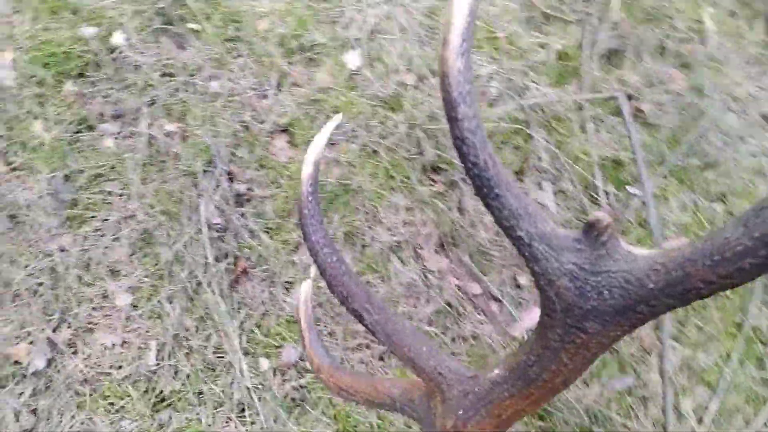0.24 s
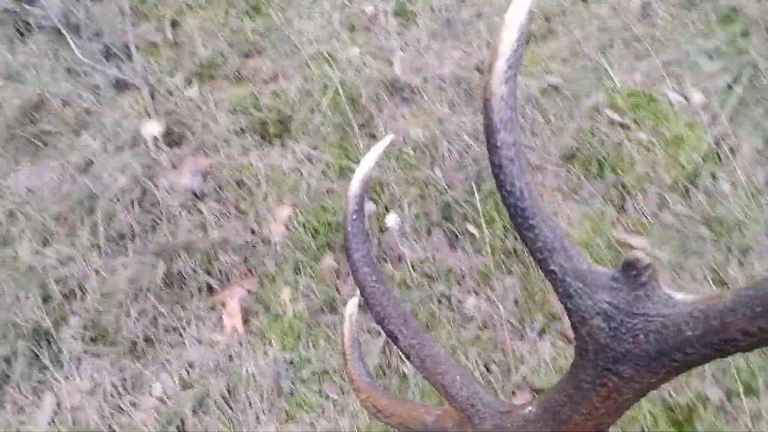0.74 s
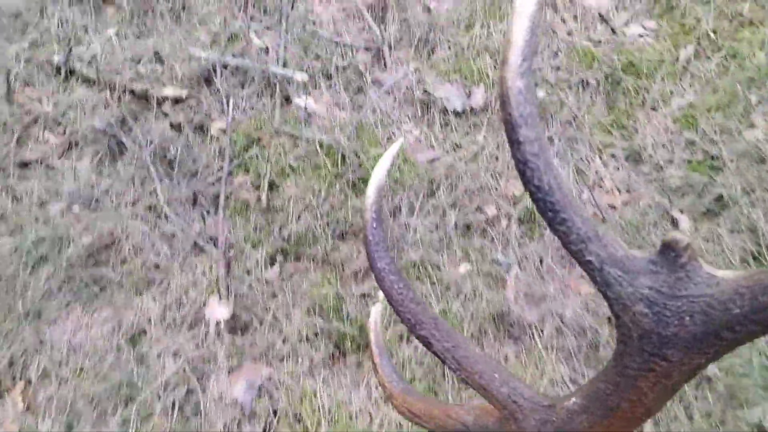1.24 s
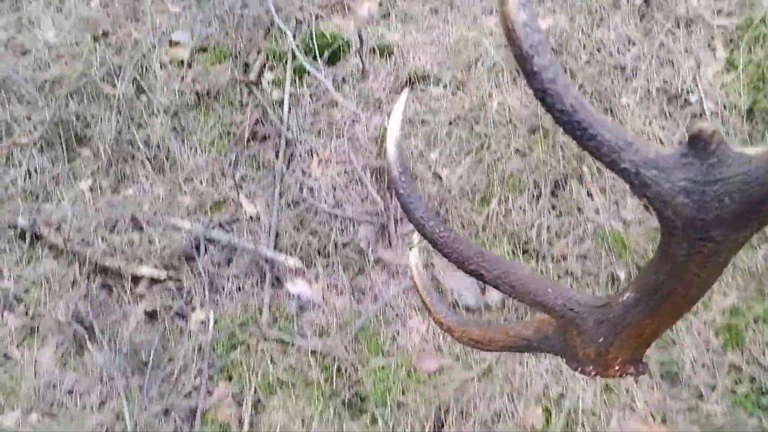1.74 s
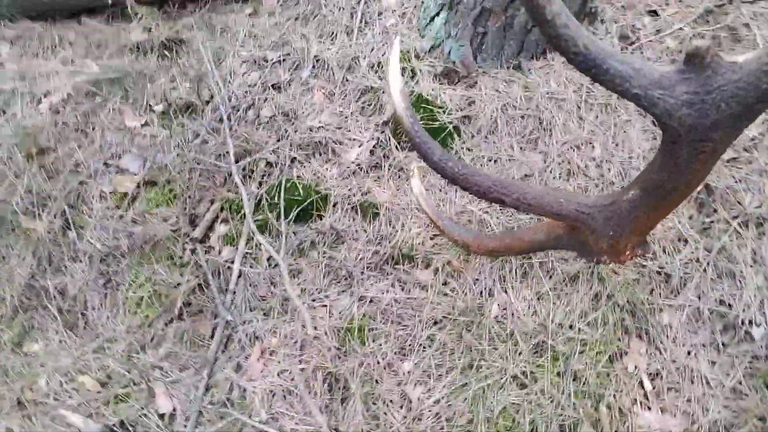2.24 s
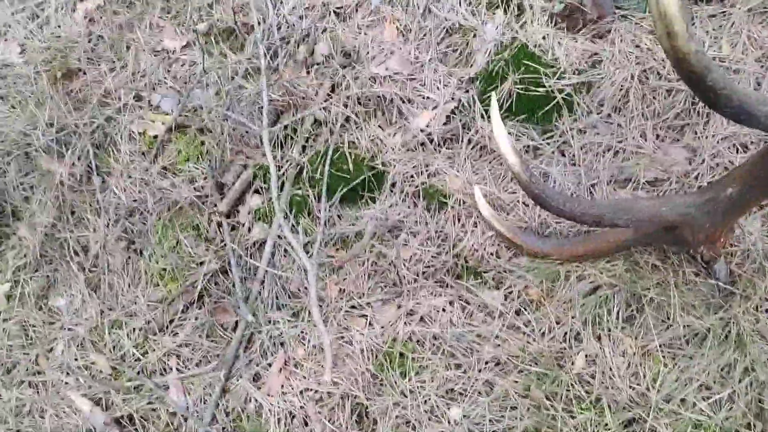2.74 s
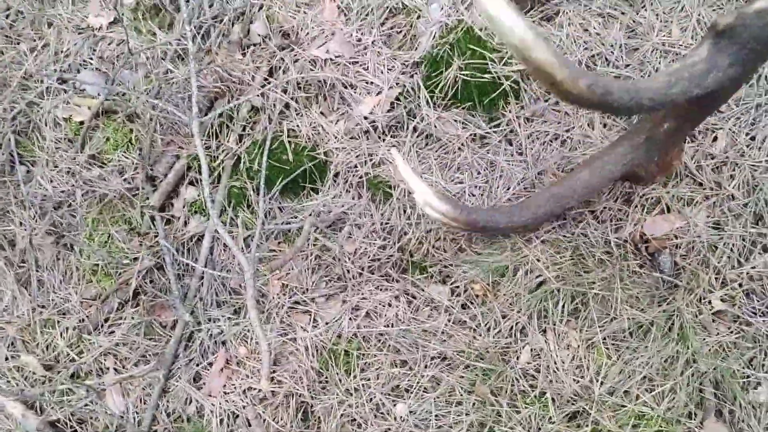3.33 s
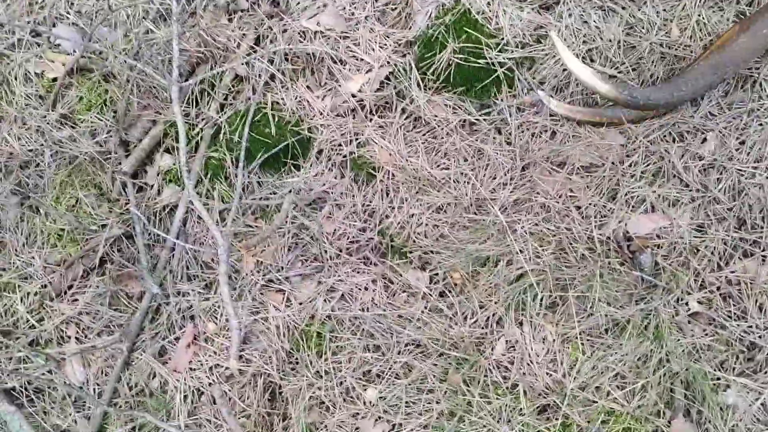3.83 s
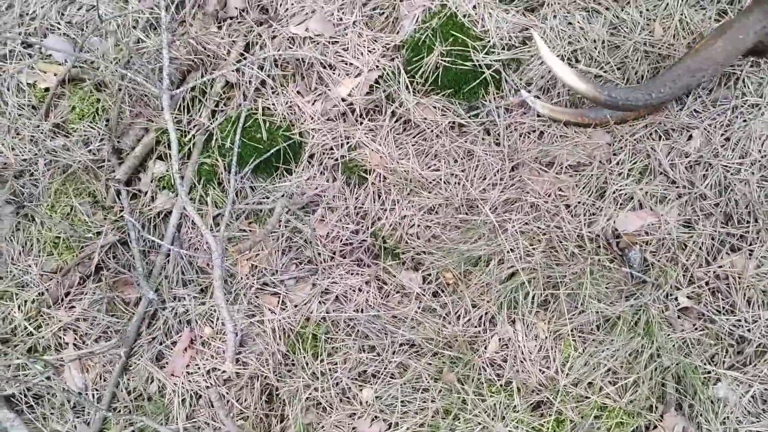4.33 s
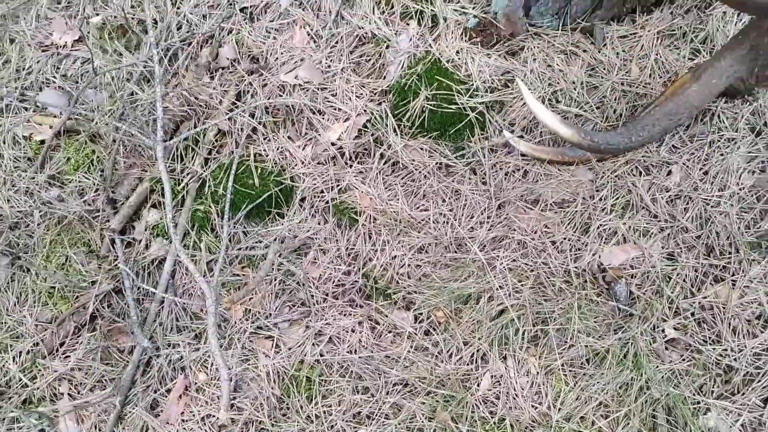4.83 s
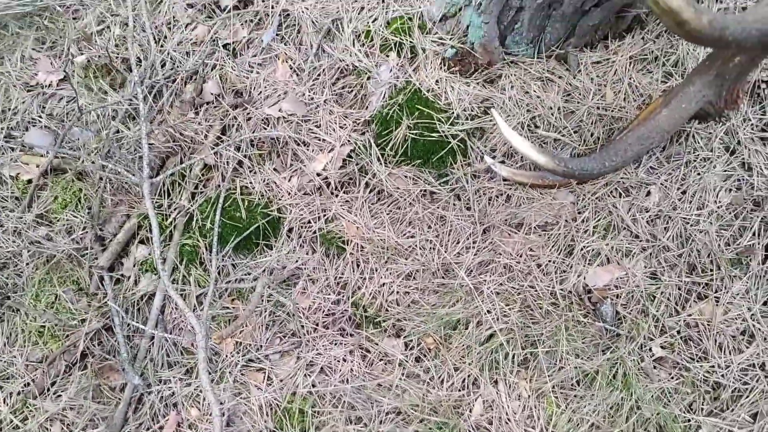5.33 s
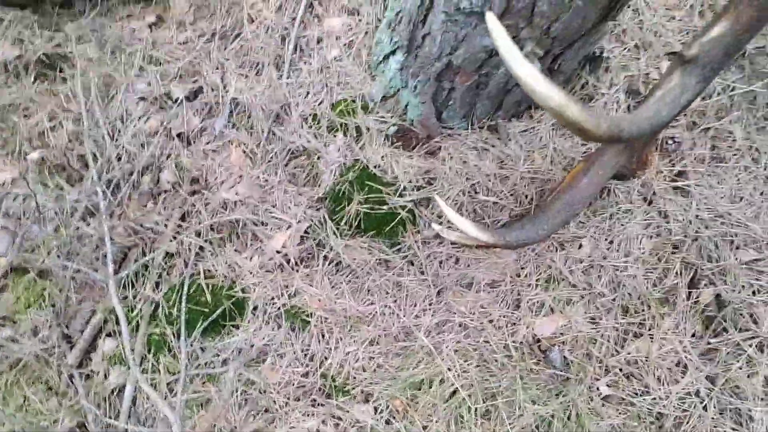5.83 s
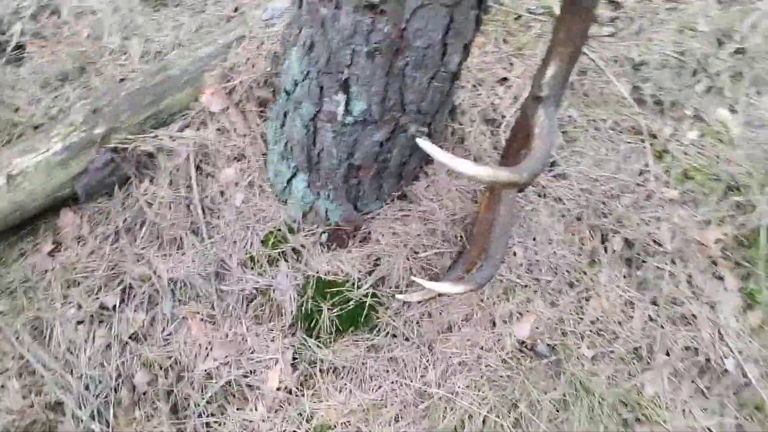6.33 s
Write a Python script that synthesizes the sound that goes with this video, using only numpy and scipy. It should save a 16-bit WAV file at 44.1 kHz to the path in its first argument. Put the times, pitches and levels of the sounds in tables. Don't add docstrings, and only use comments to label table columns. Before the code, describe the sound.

Slow boots crush dry needles, grass and twigs on a quiet forest floor, heard close from above in stereo by a hand-held phone, over barely audible distant wind. From 0 to 3.7 s the tread is a bright, uneven crackle with dull soil crunch beneath; a twig snaps loudly at 1.1 s, others around 1.4 to 1.5 s and 2.0 to 2.5 s, with soft thuds at 0.7 and 2.2 s. At 3.8 s a strong dragging scuff leads into clustered snaps and a soft low knock near 4 s. Light shifting rustles and a few ticks follow, fading almost to silence around 5.4 s. From 5.9 s crunching swells again, with a thud at 6.05 s, a sharp snap at 6.2 s, and a hard bump at 6.38 s, clicky and hollow with a low push on the left. Snaps and a scuff finish by 6.5 s.

```python
import sys
import numpy as np
from scipy import signal
from scipy.fft import rfft, irfft, next_fast_len
from scipy.io import wavfile
from scipy.ndimage import uniform_filter1d

SR = 44100
rng = np.random.default_rng(int(sys.argv[2]) if len(sys.argv) > 2 else 0)


def invert_db(x):
    u = np.asarray(x, float) / 20
    return 10 ** u


def wrap_up_sound(samples):
    columns = np.atleast_2d(samples).T
    tamed = np.clip(columns, -1, 1)
    steps = np.round(tamed * 32767).astype(np.int16)
    wavfile.write(sys.argv[1], SR, steps)


N = 289888
PORT_LAG = 3

# (frequency [Hz], left [dB], right [dB])
PORT_COLOUR = [(153, 9, 4), (318, 4, -2), (810, 0, -4), (1870, -3, 0.5), (2840, -5, -10),
               (4380, -3.5, -3.5), (5500, -0.5, 6.5), (6770, 3.5, 10), (8040, 9.5, 9), (8990, 8, 16),
               (9840, 4.5, 10), (12000, -6, -2), (14200, -5.5, -4.5), (17300, -5.5, -20.5)]
# (frequency [Hz], left [dB], right [dB])
HUM_COLOUR = [(13.9, 20.5, 17.5), (39, 5, -10), (97, -7, -14), (324, 2.5, -6), (724, -11, -31.5),
              (2000, -27, -29.5), (3860, -25.5, -19.5), (7500, -42, -41.5), (9000, -54, -32.5),
              (10500, -68, -61), (14000, -52, -55)]
# (time [s], level [dB])
AIR_GUSTS = [(0.0, -67), (0.12, -73), (1.67, -72), (1.75, -78), (1.81, -67), (2.44, -75), (2.51, -63),
             (2.91, -73), (3.03, -67), (3.12, -75), (3.86, -67), (3.98, -60), (4.03, -70), (5.7, -71),
             (6.19, -63), (6.3, -55)]
# (time [s], rise [s], level [dB])
SOIL_THUDS = [
    (0.711, 0.0049, -51.5),
    (2.191, 0.0042, -49),
    (2.391, 0.0046, -54),
    (2.848, 0.0066, -61),
    (3.53, 0.0052, -59),
    (3.956, 0.014, -50),
    (4.05, .05, -64),
    (4.33, .03, -64),
    (6.043, 0.004, -49),
    (6.245, 0.0041, -52.5),
]
# (time [s], start pitch [Hz], end pitch [Hz], time to fade 60 dB [s], left [dB], right [dB])
BODY_KNOCKS = [
    (3.966, 310, 234, 0.06, -41.5, -50),
    (6.3823, 890, 690, 0.0075, -14.5, -31),
    (6.3802, 9250, 9250, 0.007, -16, -8),
    (6.3797, 14800, 14000, 0.003, -20, -22),
    (6.4636, 14000, 14000, 0.003, -28, -34),
    (6.3799, 5500, 5300, 0.004, -13, -10),
    (6.3890, 215, 156, 0.058, -22, -56),
]
# (time [s], rise [s], left level [dB])
PRESSURE_DIPS = [
    (6.384, 0.0066, -18),
]
# (time [s], peak [dB], wood re peak [dB], body re peak [dB], left minus right [dB])
STICK_BREAKS = [(.0439, -41.5, -7, -1, -10.5), (.1254, -22, -16, -18, 2), (.414, -52, -16, -11, -5),
                (.7104, -29, -34, -18, -6), (.726, -35, -26, -13.5, -9), (1.0928, -15, -36, -27, -2.5),
                (1.1121, -40.5, -16, -12, -6), (1.2095, -42, -9, -8, -15), (1.417, -23, -19, -30, -2),
                (1.4535, -28, -6.5, -19, -4), (1.5198, -25.5, -24, -18, 2), (1.5564, -40, -7.5, -12.5, -6),
                (2.0168, -38, -24, -21, -8), (2.0408, -30, -13, -19, -3), (2.0614, -27, -17, -24, -8),
                (2.396, -38, -23, -16, -5.5), (2.4345, -42, -22, -15, -4), (6.1369, -30, -20, -23, 1.5),
                (6.379, -16, -14, -24.5, 3), (6.4635, -14, -28, -29, 8), (6.497, -33.5, -12, -11, -4),
                (6.5021, -29, -18, -17.5, 6), (6.5138, -33, -30, -24, 2.5), (6.534, -21, -33, -25, -2)]
# (time [s], peak [dB], wood re peak [dB], splinters re peak [dB], left minus right [dB])
TWIG_TEARS = [(.5443, -27, -23, -23, -18), (.7668, -27, -39, -18, -13.5), (2.4977, -25, -30, -20, -2),
              (3.8206, -33, -12, -20, -9), (3.953, -27, -7, -17, 1), (3.9552, -19, -13, -15, .5),
              (3.9951, -19, -49, -12, 7), (4.0185, -28, -22, -20, 2.5), (4.0845, -26.5, -16, -2, 6),
              (4.4556, -24, -13.5, -1, 2.5), (4.513, -25.5, -24, -13, 3.5), (4.5407, -43, -25, -11, -6),
              (4.9607, -37, -17, -9, -5), (1.132, -46, -22, -20, -2), (4.15, -46, -26, -20, -6),
              (5.4093, -58, -20, -20, -1), (5.5313, -55, -28, -20, -6), (6.054, -35, -16, -13, -8),
              (6.1922, -13, -33, -12, -7)]
# (time [s], peak [dB], left minus right [dB])
STEM_TICKS = [(.5137, -47, -9), (.5177, -46, -6.5), (.8126, -45, -6.5), (1.0365, -46, -3),
              (1.3219, -38, -3), (1.8657, -35, -5), (1.899, -35, -6), (1.952, -42, -6), (2.0655, -32, -6),
              (2.13, -37, -5), (2.175, -36, -5), (2.179, -36, -5), (2.258, -35, -5), (2.742, -37, -6),
              (2.808, -31, -6), (2.818, -33, -6), (2.871, -37, -6), (3.262, -37, -7), (3.4456, -36, -7.5),
              (3.7813, -42, -5), (3.8033, -33, -6), (3.881, -38, -5), (3.9, -39, -5), (4.364, -46, -6),
              (4.3989, -50, -6), (4.6663, -54, -4.5), (4.8519, -53, 0), (4.8683, -50, 0),
              (5.003, -49, -2.5), (6.1105, -31, -2.5), (.571, -36, -6), (.617, -37, -12), (.841, -34.5, -9),
              (.8751, -32, -10), (1.057, -43, -3.5), (1.154, -38, -2), (1.3484, -40, -18),
              (1.835, -39.5, -8), (1.8876, -31.5, -7.5), (2.0348, -30.5, -9), (2.0549, -28, -7),
              (2.112, -35, -11), (2.4787, -41, 0), (2.5054, -29.5, -4), (2.5455, -33.5, -12),
              (3.035, -40, -11), (3.209, -31.5, -6), (3.252, -39, -7.5), (3.3635, -38, -10.5),
              (3.6278, -42, 0), (4.0229, -31.5, -4), (4.2794, -38.5, -11), (4.3129, -39.5, -4),
              (4.6812, -45, 2), (4.748, -50, -2), (4.9047, -47, 0), (5.1224, -51, -1), (5.5097, -52.5, -9),
              (6.1886, -26, -3), (6.1912, -19, -6)]
# (time of top [s], rise [s], fall [s], swell [dB])
SOLE_SCUFFS = [
    (.575, 0.0091, 0.075, 6.5),
    (1.185, .006, .09, 5),
    (1.839, 0.013, 0.065, 7.5),
    (2.04, 0.038, 0.027, 8.5),
    (2.499, .004, 0.11, 8),
    (2.811, 0.021, 0.036, 5.5),
    (3.215, 0.0055, 0.078, -0.5),
    (3.835, 0.039, 0.043, 18.5),
    (6.046, 0.0047, 0.037, 6.5),
    (6.47, 0.0046, 0.029, 10),
]
# (time of top [s], time to rise 20 dB [s], time to fall 20 dB [s], crackle [dB], soil crunch [dB])
WALKING_PRESSES = [(.1, .5, .27, -56, -62), (.43, .4, .3, -74, -69), (.56, .07, .5, -55, -65),
                   (.66, .18, .25, -52, -59), (.84, .2, .16, -58, -62), (1.11, .16, .1, -58, -72),
                   (1.19, .04, .6, -58, -57), (1.33, .17, .2, -46.5, -58), (1.5, .4, .17, -55, -57),
                   (1.74, .4, .3, -74, -75), (1.88, .05, .6, -58, -67), (2.03, .18, .6, -52, -62),
                   (2.23, .5, .2, -48, -57), (2.4, .4, .25, -59, -61), (2.56, .3, .6, -53, -76),
                   (2.72, .25, .5, -50, -64), (2.85, .3, .3, -51, -68), (2.99, .5, .18, -54, -63),
                   (3.27, .18, .4, -52, -61), (3.53, .6, .25, -53, -64), (3.68, .5, .3, -59, -75)]
# (time of top [s], time to rise 20 dB [s], time to fall 20 dB [s], crackle [dB], soil crunch [dB])
WEIGHT_SHIFTS = [(3.86, .4, .4, -57, -66), (4.0, .1, .2, -49, -59), (4.23, .25, .1, -59, -68),
                 (4.35, .5, .25, -66, -68), (4.51, .3, .045, -58, -80), (4.7, .3, .4, -73, -84),
                 (4.93, .25, .3, -64, -74), (5.12, .4, .07, -72, -80), (5.42, .5, .5, -86, -88),
                 (5.65, .22, .6, -70, -75), (5.86, .25, .2, -56, -69), (6.05, .03, .4, -56, -59),
                 (6.14, .13, .5, -45, -53), (6.22, .4, .24, -49, -63), (6.56, .15, .2, -45, -51)]
# (time [s], left minus right [dB])
PHONE_TURN = [(0, -1), (.27, 1), (.45, -4), (.8, -5), (.97, 0), (1.4, 1.5), (1.72, 1.5), (1.92, -4.5),
              (2.4, -2.5), (2.95, -6), (3.17, -2), (3.33, -6), (3.85, -4), (4.15, 1.5), (4.5, -3),
              (4.95, 1), (5.9, -2.5), (6.57, 2.5)]


def level(x, db):
    return x * invert_db(db) / np.sqrt(np.mean(np.mean(x, axis=0) ** 2))


def colour(x, table):
    hz, *channels_db = np.transpose(table)
    size = next_fast_len(N + 4096)
    log_hz = np.log(np.maximum(np.fft.rfftfreq(size, 1 / SR), 1))
    curves_db = np.array([np.interp(log_hz, np.log(hz), db) for db in channels_db])
    cepstrum = irfft(np.log(invert_db(curves_db)), size)
    cepstrum[:, 1:size // 2] *= 2
    cepstrum[:, size // 2 + 1:] = 0
    return irfft(rfft(x, size) * np.exp(rfft(cepstrum)), size)[:, :N]


def band(x, lo_hz, hi_hz):
    return signal.sosfilt(signal.butter(2, [lo_hz, hi_hz], "band", fs=SR, output="sos"), x)


def pair(alike, size=N, lag=0):
    mid, side = rng.standard_normal((2, size))
    alike = np.clip(alike, 0, 1)
    left, right = np.sqrt(1 + alike) * mid + np.sqrt(1 - alike) * side * np.array([[1], [-1]])
    return np.array([np.roll(left, lag), right])


def walk(rate_hz):
    hold = int(SR / rate_hz)
    steps = np.repeat(rng.standard_normal(N // hold + 1), hold)
    return 1.15 * uniform_filter1d(uniform_filter1d(steps, hold), hold)[:N]


def hum():
    wind = level(colour(pair(alike=0.19), HUM_COLOUR), -65.5) * invert_db(0.72 * walk(2.53))
    air = level(band(pair(alike=0.11), 11, 95) * np.array([[1], [.4]]), -71.5)
    gust_db = np.interp(np.arange(N) / SR, *np.transpose(AIR_GUSTS)) + 69.5
    return wind + air * invert_db(gust_db + 1.5 * walk(9))


def thuds():
    start, rise, db = np.transpose(SOIL_THUDS)
    u = np.maximum(np.arange(N) / SR - start[:, None], 0) / rise[:, None]
    swell = invert_db(db) @ (u * np.exp(1 - u))
    return swell * level(band(pair(alike=0.88), 125, 352) * np.array([[1], [.45]]), 0)


def knocks():
    t, out = np.arange(N) / SR, 0
    for s, start_hz, end_hz, fade_s, *db in BODY_KNOCKS:
        u = np.maximum(t - s, 0)
        turns = end_hz * u + (start_hz - end_hz) * 0.0032 * (1 - np.exp(-u / 0.0037))
        ring = np.sin(2 * np.pi * turns) * 1000. ** (-u / fade_s)
        out = out - invert_db(np.array(db))[:, None] * ring
    return out


def pressure_dips():
    t, out = np.arange(N) / SR, 0
    for s, rise, db in PRESSURE_DIPS:
        u = np.maximum(t - s, 0) / rise
        swing_back = 0.2 * (u / 4.6) * np.exp(1 - u / 5.5)
        push = u * np.exp(1 - u) - swing_back
        out = out - invert_db(db) * push * np.array([[1], [.03]])
    return out


def breaks():
    sticks = [(*row, -22) for row in STICK_BREAKS]
    twigs = [(s, db, wood, -53, pan, tail) for s, db, wood, tail, pan in TWIG_TEARS]
    ticks = [(s, db, -22, -27, pan, -19) for s, db, pan in STEM_TICKS]
    return sticks + twigs + ticks


def snaps():
    t = np.arange(1024) / SR
    parting = np.exp(-((t - .0006) / np.where(t < .0006, .00012, .0007)) ** 2)
    wood_swell = np.exp(-((t - .0014) / .00054) ** 2)
    body_swell = np.exp(-((t - .0023) / .001) ** 2)
    splinters = (1 - np.exp(-t / .001)) ** 2 * np.exp(-t / .003)
    crack, wood, body = (np.zeros((2, N + len(t))) for _ in range(3))
    for s, db, wood_db, body_db, pan_db, tail_db in breaks():
        tail = invert_db(tail_db) * splinters
        at = slice(int(s * SR), int(s * SR) + len(t))
        gain = invert_db(db + np.array([[pan_db + 2.0], [-pan_db - 3.5]]) / 2)
        noise = np.sign(pair(alike=0.7, size=len(t), lag=PORT_LAG))
        crack[:, at] += gain * noise * (parting + tail)
        wood[:, at] += gain * invert_db(wood_db) * noise * (wood_swell + tail)
        body[:, at] += gain * invert_db(body_db) * pair(alike=0.67, size=len(t)) * (body_swell + tail)
    heard = invert_db(-2.5) * band(crack, 3200, 14000)
    heard += invert_db(12.5) * band(wood, 2080, 4760)
    heard += invert_db(14) * band(body, 322, 1820)
    return colour(heard[:, :N], PORT_COLOUR)


def scuffs():
    t = np.arange(N) / SR
    return sum(db * np.exp(-((t - s) / np.where(t < s, rise, fall)) ** 2)
               for s, rise, fall, db in SOLE_SCUFFS)


def presses(table, column, slope):
    rows = np.array(table)[:, :, None]
    grid = np.arange(0, N + 64, 64)
    u = grid / SR - rows[:, 0]
    db = rows[:, column] - 20 * slope * np.where(u < 0, -u / rows[:, 1], u / rows[:, 2])
    return np.interp(np.arange(N), grid, invert_db(2 * db).sum(axis=0))


def load():
    walking = presses(WALKING_PRESSES, column=3, slope=1)
    shifting = presses(WEIGHT_SHIFTS, column=3, slope=1)
    crunch = presses(WALKING_PRESSES + WEIGHT_SHIFTS, column=4, slope=.7)
    swell_db = scuffs()
    fine_db = 10 * np.log10(walking + shifting) + swell_db
    soil_db = 10 * np.log10(crunch) + .6 * swell_db
    fizz_db = 10 * np.log10(walking * invert_db(2 * -17.5) + shifting * invert_db(2 * -25)) + swell_db
    stalk_share = .62
    stalk_db = stalk_share * fine_db + (1 - stalk_share) * soil_db - 5
    return fine_db, stalk_db, soil_db, fizz_db


def cracks(rate_hz, spread_db, ring_s, bed):
    chance, size = rng.random(N), rng.exponential(size=N)
    power = (chance < rate_hz / SR) * invert_db(2 * spread_db * np.minimum(size, 4.0))
    fade = np.exp(-1 / (ring_s * SR))
    power = signal.lfilter([1], [1, -2 * fade, fade ** 2], power)
    return np.sqrt(power / power.mean() + bed ** 2)


def tread(fine_db, stalk_db, soil_db, fizz_db, pan_db):
    sharp = cracks(1500, spread_db=2.6, ring_s=0.0012, bed=0.3) * invert_db(3.2 * walk(30))
    dull = cracks(300, spread_db=3.5, ring_s=0.0022, bed=0.96) * invert_db(3.4 * walk(20))
    fine = band(colour(sharp * pair(alike=0.25, lag=PORT_LAG), PORT_COLOUR), 4400, 13700)
    needles = sharp * pair(alike=.25, lag=PORT_LAG)
    fizz = band(band(needles, 11600, 16400), 11600, 16400)
    stalks = sharp * invert_db(2.3 * walk(15)) * pair(alike=0.2, lag=PORT_LAG)
    stalks = band(colour(stalks, PORT_COLOUR), 1800, 4900)
    soil = band(colour(dull * np.sqrt(sharp) * pair(alike=0.7), PORT_COLOUR), 218, 1330)
    turn = invert_db(np.array([pan_db + 5.5, -(pan_db + 3.5)]) * 0.47)
    high = level(fine, 0) * invert_db(fine_db) * turn + level(fizz, 0) * invert_db(fizz_db - 2.5)
    return high + level(stalks, 0) * invert_db(stalk_db) + level(soil, 0) * invert_db(soil_db)


def scene():
    turn_db = np.interp(np.arange(N) / SR, *np.transpose(PHONE_TURN))
    return hum() + thuds() + knocks() + pressure_dips() + snaps() + tread(*load(), turn_db)


def low_pass(x):
    return signal.sosfilt(signal.butter(12, 16630, fs=SR, output="sos"), x)


def record(dry):
    return low_pass(dry)


dry = scene()
out = record(dry)
wrap_up_sound(out)
```